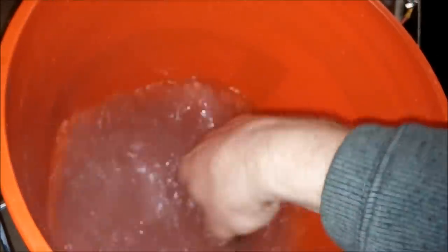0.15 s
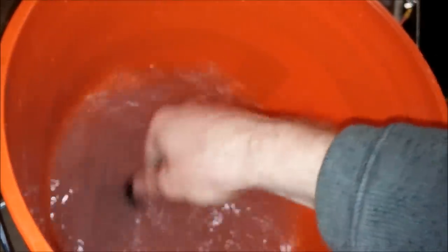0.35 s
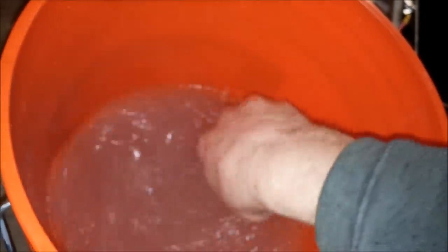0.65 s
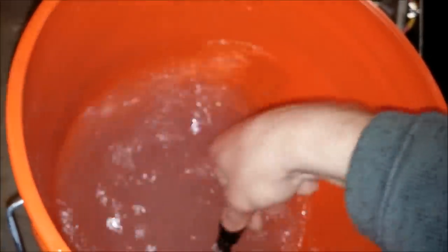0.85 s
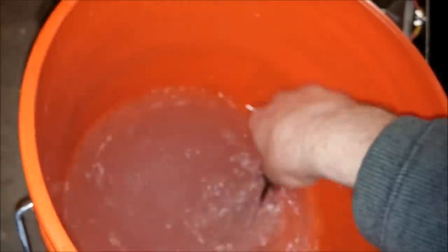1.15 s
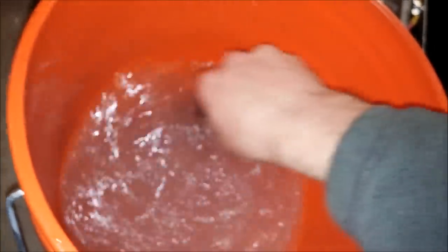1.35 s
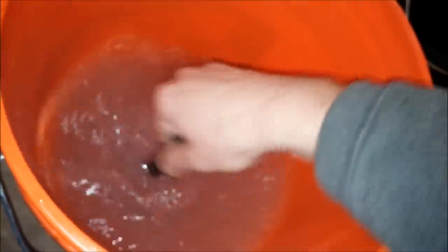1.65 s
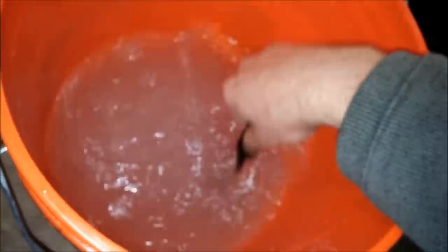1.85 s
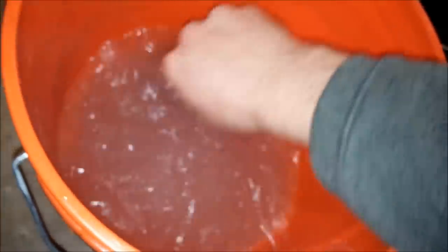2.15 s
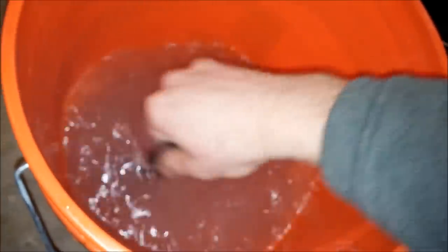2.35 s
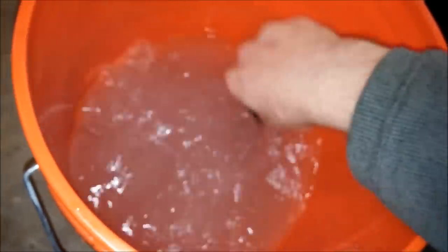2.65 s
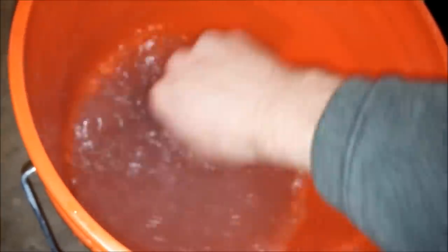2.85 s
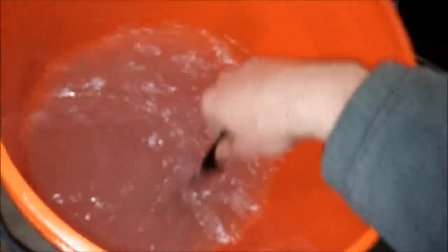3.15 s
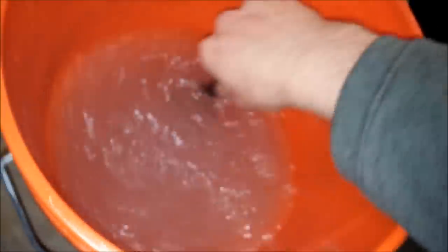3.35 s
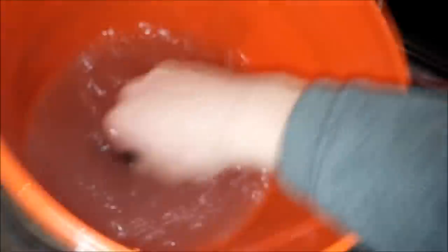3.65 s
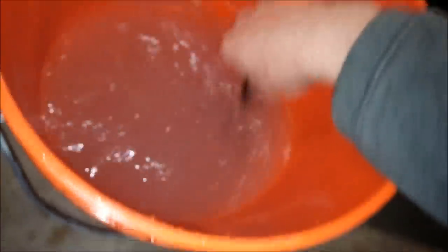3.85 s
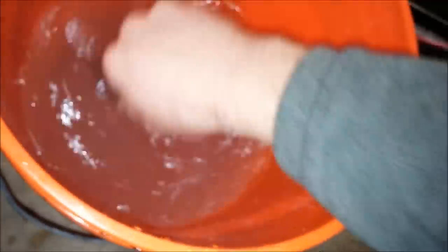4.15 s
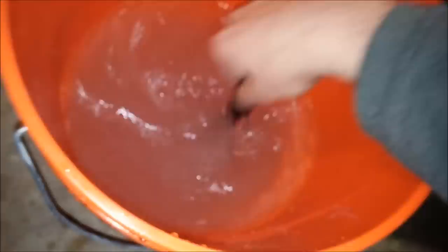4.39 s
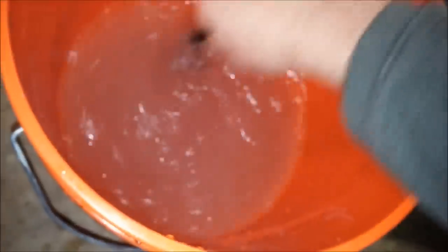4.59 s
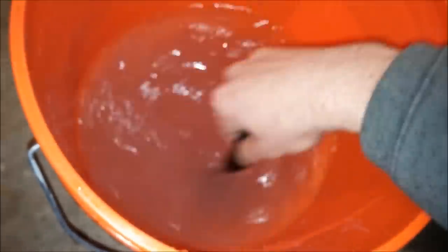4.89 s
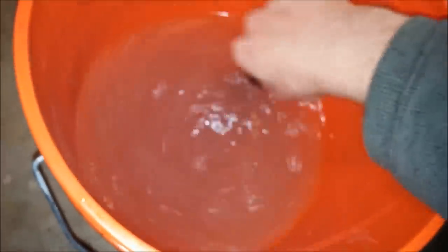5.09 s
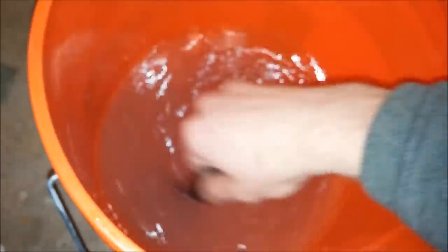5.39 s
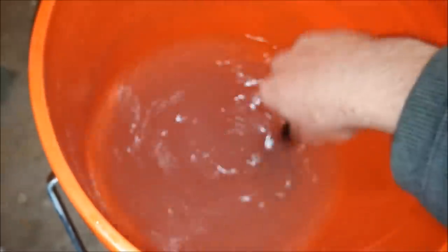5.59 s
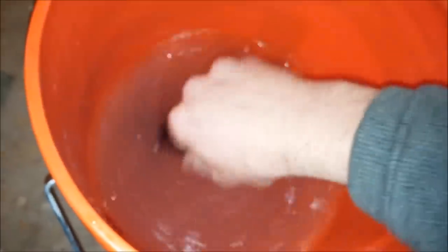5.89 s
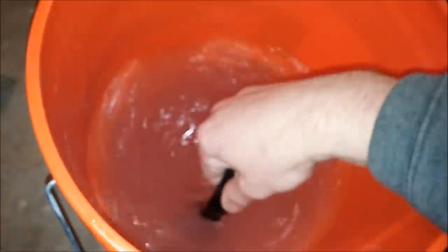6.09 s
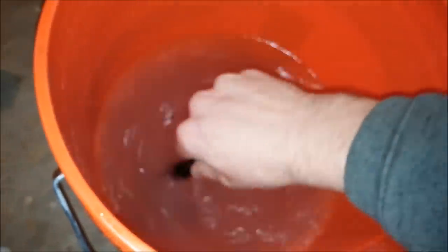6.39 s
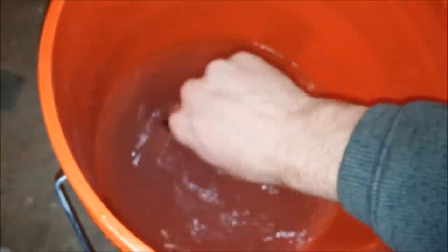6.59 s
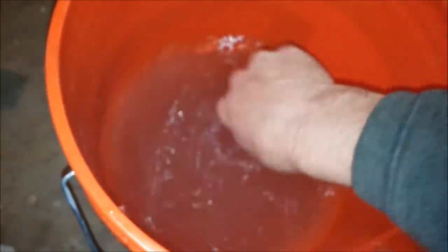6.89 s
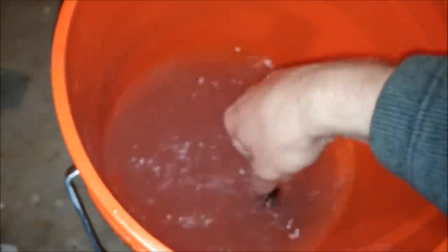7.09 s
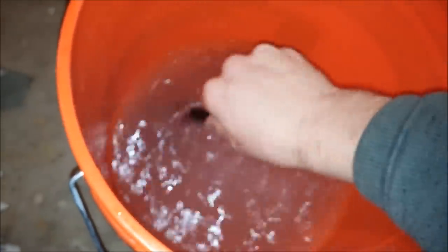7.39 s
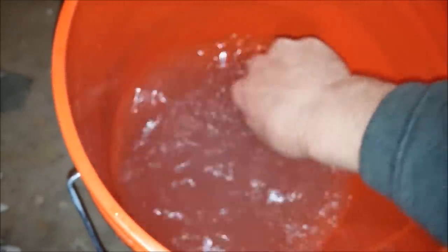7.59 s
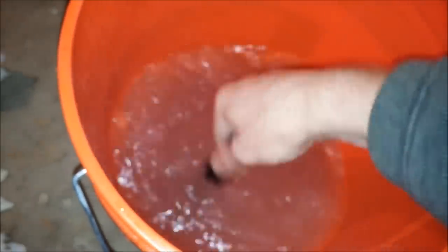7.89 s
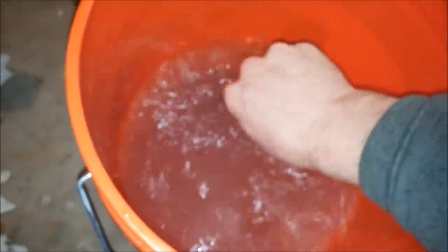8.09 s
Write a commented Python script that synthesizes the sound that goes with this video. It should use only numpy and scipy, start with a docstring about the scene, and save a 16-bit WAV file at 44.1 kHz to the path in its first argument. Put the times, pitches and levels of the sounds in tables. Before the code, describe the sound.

A hand stirs water with a short rod in a plastic bucket, close up in a quiet workshop. From 0 s come strong swashes with round plops and deep hollow gulps, a heavy one near 0.7 s; a faint low drone swells around 0.4 to 1 s and fades by 2 s. Surges follow every fifth to third of a second, with slaps, fizzing spray and snapping droplets, a sharp slap near 2.5 s. A tiny dry tick falls at 3.5 s, a light plastic knock at 4.3 s, then a bright slap at 4.5 s. Stirring grows lighter from 5 s and nearly stops around 6 to 6.3 s, leaving faint bubble blips. A quick string of plops leads into renewed churning at 6.4 s, with a big gulp at 7 s, a ringing slap at 7.3 s and busy sloshing until the end after 8 s. Gaps are damped; the left is louder.

```python
"""Stirring water in a bucket

A hand stirs water in a plastic bucket with a short rod. The wake traps bubbles of all sizes, made as
short fading tones: deep gulps, plops and fine spray, over a wash of shaped noise. The air column above
the water rings like a closed pipe, and the walls scatter the upper notes. A knock, a dry tick and a
faint workshop drone join in. Handheld microphones above the rim turn themselves down in quiet moments.
"""
import sys
import numpy as np
from scipy import signal
from scipy.fft import rfft, irfft, next_fast_len
from scipy.io import wavfile
from scipy.ndimage import uniform_filter1d

SR = 44100
rng = np.random.default_rng(int(sys.argv[2]) if len(sys.argv) > 2 else 0)


def inscribe(sig):
    """Save sig as 16-bit PCM at rate SR to the path in sys.argv[1].

    A 1-D sig is mono; a 2-D sig holds one channel per row.
    Samples are clipped to [-1, 1] before scaling.
    """
    pcm = np.round(np.clip(np.atleast_2d(sig).T, -1, 1) * 32767)
    wavfile.write(sys.argv[1], SR, pcm.astype(np.int16))


def nominal_scale(level):
    """Amplitude ratio for a level in decibels (scalar or array-like)."""
    x = np.asarray(level, float) / 20
    return 10 ** x


N = 363384

# Dull air of the workshop. Each row: frequency in Hz, relative level in dB per Hz.
WORKSHOP_AIR = [(25, -10.5), (60, -1.5), (120, 2), (200, -29), (15000, -63)]
# Low drone near 88 Hz. Each row: time in seconds, level in dB before it wavers.
DRONE = [(0, -54), (.35, -31), (1.0, -35.5), (1.15, -41.5), (2.2, -54)]
# Notes of the air column above the water. Each row: frequency in Hz, width in Hz, strength in dB.
AIR_COLUMN = [(281, 44.3, 18.5), (764, 49, 10.5), (1250, 127, 3), (1580, 324, 1.5), (3920, 2000, -4),
              (6145, 2520, 9)]
# Sound bouncing between the bucket walls. Each row: frequency in Hz, time to fade by 60 dB in seconds.
WALL_FADE = [(300, 0.39), (1500, 0.026), (6000, 0.033), (14000, 0.014)]
# How much louder the left microphone is than the right. Each row: frequency in Hz, difference in dB.
LEFT_OVER_RIGHT = [(60, 5), (380, 3.5), (2380, 8.5), (15000, 5.5)]
# Knocks on the bucket wall. Each row: time in seconds, relative level in dB.
KNOCKS = [(4.316, 3)]
# Dry ticks close to the microphones. Each row: time in seconds, level in dB.
TICKS = [(3.5174, 8.5)]
TICK_ECHO_S = 0.00019
# Droplets snapping. Each row: start in seconds, relative level in dB, first pitch in Hz.
SNAPS = [(0.179, -10.5, 4760), (0.2506, -14.5, 7240), (1.307, -15, 1800), (1.391, -13.5, 4700),
         (1.5092, -10, 5970), (1.664, -10.5, 5570), (1.875, -13.5, 4380), (2.587, -13, 5400),
         (2.6027, -9.5, 4940), (3.052, -12.5, 5800), (4.449, -19.5, 6600), (4.479, -16.5, 5130),
         (7.383, -14, 5600)]
# Bubbles that sing or slide for a while.
# Each row: start in seconds, relative level in dB, first pitch in Hz, last pitch in Hz, length in seconds.
CHIRPS = [(0.833, -13.5, 1500, 1580, 0.012), (1.058, -9, 790, 1410, 0.027), (1.233, 1.5, 625, 820, 0.0085),
          (1.263, -9.5, 645, 920, 0.026), (3.464, -16, 793, 846, 0.036), (3.329, -16.5, 810, 694, 0.043),
          (5.726, -8.5, 1560, 2340, 0.024), (5.992, -24, 934, 960, 0.041), (6.165, -22, 2225, 2170, 0.0087),
          (7.954, -7, 1480, 1860, 0.0056), (7.964, -13.5, 615, 1380, 0.062)]
# Round single plops. Each row: start in seconds, relative level in dB, first pitch in Hz.
PLOPS = [(0.027, 5.5, 2010), (0.339, -4, 1980), (0.363, -1, 2080), (0.423, -8, 1680), (0.994, -16, 885),
         (1.026, -6.5, 1840), (1.285, 4.5, 1284), (1.914, -5, 2100), (1.947, -3.5, 2060), (2.019, -1, 1190),
         (2.130, -9, 784), (2.469, -6, 2100), (2.708, 2, 1250), (3.036, -0.5, 1140), (4.426, -3, 1500),
         (4.902, -10.5, 1550), (5.101, -8.5, 1250), (5.614, -4, 3420), (5.892, -13.5, 1700),
         (6.09, -21, 7060), (6.212, -19.5, 4600), (6.262, -19, 3100), (6.279, -22, 1420),
         (6.313, -10.5, 4620), (6.35, -8, 1950), (6.372, -1.5, 1880), (6.406, -1, 1850), (6.487, 3, 1910),
         (6.558, -2, 1860), (6.572, 3, 525), (6.996, -1, 2190), (7.034, 5.5, 3620), (7.183, 1, 3400),
         (8.224, 0.5, 3700)]
PLOP_CYCLES, PLOP_LAST_OVER_FIRST = 8, 0.89  # length in cycles of the first pitch, ratio of pitches
# Large air pockets closing. Each row: start in seconds, relative level in dB, first pitch in Hz.
GULPS = [(0.002, -3, 324), (0.29, 1.5, 267), (0.672, -2, 340), (1.06, -6.5, 280), (1.173, -0.5, 279),
         (1.641, -8, 260), (2.123, -10, 266), (2.714, -10.5, 250), (3.228, -5.5, 213), (3.647, -11, 267),
         (4.484, -10, 297), (5.596, -10, 250), (6.461, -5, 286), (6.572, 1.5, 281), (7.044, 4, 326),
         (7.742, 1, 270), (7.878, -4.5, 308), (8.189, -5.5, 296)]
# Slaps of water against rod and wall. Each row: start in seconds, relative level in dB, first pitch in Hz.
SLAPS = [(0.073, -1, 715), (0.29, -3, 1310), (0.665, -2.5, 764), (1.232, -11, 1130), (1.392, -11.5, 1276),
         (1.638, -8.5, 720), (1.754, -1, 720), (1.895, -1.5, 1400), (2.482, 2, 774), (3.121, -13, 735),
         (3.217, -11.5, 1520), (3.442, -3, 800), (3.642, -7.5, 1060), (3.818, -5.5, 814), (3.93, -12, 1250),
         (4.019, -12.5, 1050), (4.218, -8.5, 1250), (4.389, -10, 950), (4.533, 0.5, 1380),
         (4.775, -10.5, 1210), (5.171, -7.5, 1120), (5.496, -14.5, 826), (6.677, -8, 1150),
         (6.949, -6, 1150), (6.988, -3.5, 1140), (7.31, 2, 740)]
# Surges of the wake as the rod shoves through. Each row: start in seconds, hold in seconds,
# relative strength in dB, air dragged deep in dB over that strength.
SURGES = [(-0.05, 0.12, -13, 6.5), (0.152, 0.19, -20.5, -4.5), (0.305, 0.35, -30, 4), (0.45, 0.088, -26, 4),
          (0.653, 0.017, -8, 5), (0.978, 0.12, -18.5, -9), (1.124, 0.16, -16.5, 3.5),
          (1.323, 0.097, -26, -47), (1.467, 0.095, -26, -21), (1.631, 0.083, -22.5, 1.5),
          (1.754, 0.23, -21.5, -2.5), (2.053, 0.12, -20, -3.5), (2.247, 0.11, -25, -1.5),
          (2.438, 0.23, -26, -3.5), (2.549, 0.23, -19, -15), (2.899, 0.15, -24, -11.5),
          (3.105, 0.011, -18.5, -9), (3.203, 0.012, -21, 5), (3.421, 0.063, -22.5, 4),
          (3.542, 0.18, -28.5, -4.5), (3.798, 0.15, -21, -7), (4.013, 0.008, -19, -3.5),
          (4.128, 0.17, -34, 4.5), (4.391, 0.097, -15, -8.5), (4.532, 0.054, -17.5, 5),
          (4.756, 0.052, -35.5, 0), (4.852, 0.026, -25.5, -12), (4.98, 0.13, -24, -21),
          (5.154, 0.034, -19, 2), (5.278, 0.057, -30.5, -22), (5.56, 0.2, -22.5, -4.5),
          (5.863, 0.12, -36, -12), (6.163, 0.12, -61, -9), (6.256, 0.046, -40, -37),
          (6.319, 0.074, -26.5, -24), (6.429, 0.24, -17.5, -2.5), (6.793, 0.21, -18.5, -0.5),
          (6.996, 0.083, -20.5, 12.5), (7.123, 0.35, -21, -3.5), (7.565, 0.18, -18, -13.5),
          (7.724, 0.17, -24, 8.5), (7.88, 0.3, -27.5, -6), (8.08, 0.33, -23.5, -33), (8.164, .1, -17.5, 0)]
RISE_S, SETTLE_DB_PER_S = 0.024, 174  # every surge swells, holds and settles alike
RIPPLE_DB, RIPPLE_DB_PER_S, RIPPLE_DEEP_DB = -22.5, 33.5, -40  # weak ripples that settle slowly
# How much the rod breaks the surface. Each row: time in seconds, relative spray level in dB.
BREAKING = [(0, -19.5), (1.6, -22.5), (2.6, -19.5), (3.4, -24.5), (4.6, -31.5), (5.4, -25), (6.6, -28.5),
            (7.2, -23.5), (8.24, -20.5)]
SPRAY_FOLLOWS = 0.69  # power below 1: spray swings less than the surge
# Churned water heard between the bubbles. Each row: frequency in Hz, relative level in dB per Hz.
WASH = [(120, -6), (300, -19), (500, -35.5), (1300, -5), (2600, -10), (6000, -28.5), (10000, -29),
        (16000, -34)]


def unit(x):
    """Scale to an rms of 1."""
    return x / np.sqrt(np.mean(x ** 2) + 1e-20)


def along(points, hz):
    """Read a curve of (Hz, value) points on a log frequency axis."""
    f, v = np.transpose(points)
    return np.interp(np.log(hz + 1), np.log(f + 1), v)


def curves(rows):
    """Give one value per sample for each column after the time."""
    s, *cols = np.transpose(rows)
    return [np.interp(np.arange(N) / SR, s, c) for c in cols]


def filtered(x, response):
    """Filter x by a response, possibly complex, given as a function of frequency in Hz."""
    m = next_fast_len(N + SR // 2)
    spectrum = rfft(x, m) * response(np.fft.rfftfreq(m, 1 / SR))
    return irfft(spectrum, m)[..., :N]


def bursts(s, db, decay_s):
    """A gain that jumps at each time and dies away."""
    kicks = np.bincount(np.round(s * SR).astype(int), nominal_scale(db), N)
    return signal.lfilter([1], [1, -np.exp(-1 / (decay_s * SR))], kicks)


def bubbles(s, db, hz, cycles, rise, size, vary=0.1):
    """Sines that swell, fade and glide up as they near the surface, each from its own spot in the bucket."""
    traits = np.tanh(rng.standard_normal((len(s), 3)))
    spot, life, climb = traits[:, :1], traits[:, 1:2], traits[:, 2:]
    at = np.round(s * SR).astype(int)[:, None] + np.arange(size)
    taper = np.linspace(1, 0, size) ** 0.5
    out = np.zeros((2, N))
    for ear, side in enumerate((1, -1)):
        delay = 7e-5 * (1 + side * spot)  # path to each microphone, in seconds
        t = np.maximum(np.arange(size) / SR - delay, 0)
        age = t * hz[:, None] / (cycles * np.exp(vary * life))
        glide = 1 + rise * np.exp(1.24 * climb) * age / 2
        wave = np.sin(2 * np.pi * hz[:, None] * t * glide)
        wave *= np.exp(-age) * (1 - np.exp(-1.5 * age))
        wave *= nominal_scale(db[:, None] + 2.4 * side * spot) * taper
        out[ear] = np.bincount(at.ravel(), wave.ravel(), N + size + SR)[:N]
    return out


def sliding_bubbles(rows):
    """Each clear bubble swells, slides ever faster from its first to its last pitch and fades."""
    out = np.zeros(N + SR)
    for s, db, first, last, length in rows:
        peak_shape = 0.45 + 0.41 * np.log2(max(last / first, 1))  # those that climb far peak late
        u = np.arange(round(length * SR)) / (length * SR)  # 0 to 1 over the bubble's life
        pitch = first * (last / first) ** u ** 2
        tone = np.sin(2 * np.pi * np.cumsum(pitch) / SR)
        out[round(s * SR):][:len(u)] += nominal_scale(db) * np.sin(np.pi * u ** peak_shape) * tone
    return out[:N]


def workshop():
    """Dull room air as shaped noise, and a low sine drone that wavers in pitch and level."""
    air = filtered(rng.standard_normal((3, N)), lambda hz: nominal_scale(along(WORKSHOP_AIR, hz)))
    shared_air = unit(air[0] + 0.5 * air[1:])  # partly alike in both ears
    waver = unit(filtered(rng.standard_normal(N), lambda hz: hz < 12))
    tone = np.sin(2 * np.pi * np.cumsum(88 + 3.3 * waver) / SR)
    drone = nominal_scale(3.1 * waver[::-1]) * tone  # the reversed waver moves the level
    return nominal_scale(-50.5) * shared_air + nominal_scale(curves(DRONE)[0]) * drone


def scattered(x):
    """The walls scatter the upper notes differently to each microphone, anew as the surface moves."""
    out, hop = np.zeros((2, N + 3 * SR)), SR // 8
    padded = np.pad(x, ((0, 0), (hop, 2 * hop)))
    for at in range(-hop, N, hop):  # overlapping pieces, each with a fresh noise tail
        hz, t, z = signal.stft(rng.standard_normal((2, SR // 6)), SR, nperseg=128)
        fade = nominal_scale(-60 * t / along(WALL_FADE, hz)[:, None])
        upper = (hz ** 2 / (hz ** 2 + 700 ** 2))[:, None] ** 2
        tail = signal.istft(z * fade * upper, SR, nperseg=128)[1]
        part = padded[:, at + hop:at + 3 * hop] * np.hanning(2 * hop)
        wet = signal.fftconvolve(part, tail / np.linalg.norm(tail[0]), axes=1)
        out[:, at + hop:][:, :wet.shape[1]] += wet
    return out[:, hop:N + hop]


def column_response(f):
    """The air column lifts its own notes, cancels between the lowest two and thins out below them."""
    notes = sum(nominal_scale(db) * 1j * f * w / (c * c - f * f + 1j * f * w) for c, w, db in AIR_COLUMN)
    dip = 1 - 0.59 / (1 + 1j * (f - 520) / 90)
    low_cut = (1j * f / (120 + 1j * f)) ** 2
    return (1 + notes) * dip * low_cut


def bucket(x, clear):
    """The column colours x, some clear sound passes straight by, and the walls answer both."""
    rung = filtered(x, column_response)
    return rung + 0.27 * clear + nominal_scale(1.5) * scattered(rung + 0.5 * clear)


def tick():
    """A dry one-sample click and its inverted echo."""
    out = np.zeros(N)
    for s, db in TICKS:
        out[[round(s * SR), round((s + TICK_ECHO_S) * SR)]] += nominal_scale(db) * np.array([1, -1])
    return out


def knock():
    """A click and one slow, quickly damped swing of the plastic wall."""
    out, t = np.zeros(N), np.arange(SR // 8) / SR
    swing = np.sin(2 * np.pi * 110 * t) * np.exp(-t / 0.0042)
    click = np.exp(-t / 0.00067) * np.tanh(t / 0.00004)
    for s, db in KNOCKS:
        out[round(s * SR):][:len(t)] += nominal_scale(db) * (0.27 * swing - 0.31 * click)
    return out


def snaps():
    """Droplets bursting near the rim: bubble tones that die within about a cycle."""
    return nominal_scale(20.5) * bubbles(*np.transpose(SNAPS), cycles=0.78, rise=0.0076, size=200)


def chirps():
    """Singing bubbles with their own slides, and plops that all fall by the same ratio."""
    plops = [(s, db, hz, PLOP_LAST_OVER_FIRST * hz, PLOP_CYCLES / hz) for s, db, hz in PLOPS]
    return sliding_bubbles(CHIRPS + plops)


def splashes():
    """Gulps, and slaps short enough to set the whole air column ringing."""
    gulps = bubbles(*np.transpose(GULPS), cycles=1.41, rise=0.0033, size=2600)
    slaps = bubbles(*np.transpose(SLAPS), cycles=1.56, rise=0.078, size=600)
    return nominal_scale(-11.0) * gulps + nominal_scale(-1.5) * slaps


def surges():
    """Gains of the froth and of the deep air pockets, summed over all surges."""
    t, froth, deep = np.arange(N) / SR, 0, 0
    for s, hold, db, deep_db in SURGES:
        rise = np.clip((t - s) / RISE_S, 0, 1)
        after = np.maximum(t - s - hold, 0)  # seconds since the hold ended
        shove = rise * nominal_scale(db - SETTLE_DB_PER_S * after)
        ripple = rise * nominal_scale(db + RIPPLE_DB - RIPPLE_DB_PER_S * after)
        froth = froth + shove + ripple
        deep = deep + nominal_scale(deep_db) * shove + nominal_scale(RIPPLE_DEEP_DB) * ripple
    return froth, deep


def swarm(eddies, count, centre_hz, spread, cycles, scatter_db, size):
    """Bubbles shed just after each eddy breaks; those of one eddy share its strength and lean to its size."""
    at, force, fine = eddies[:, rng.integers(eddies.shape[1], size=count)]
    s = np.clip(at + rng.exponential(0.016, size=count), 0, N / SR)
    lean = np.sqrt(0.5) * (fine + rng.standard_normal(count))
    hz = np.clip(centre_hz * np.exp(spread * lean), 100, 15000)
    db = 4.8 * force + scatter_db * np.clip(rng.standard_normal(count), -2, 2)
    db = db - 1.3 * np.log2(hz / centre_hz)  # small ones are weaker
    return unit(bubbles(s, db, hz, cycles, 0.048, size, vary=0.84))


def wake():
    """Swarms of large, middle and tiny bubbles over churned water; slaps add to all but the large ones."""
    surge, deep = surges()
    s, db, _ = np.transpose(SLAPS)
    froth = nominal_scale(-14.0) * surge + bursts(s, db - 16.5, decay_s=0.0078)
    slap_spray = bursts(s, SPRAY_FOLLOWS * db - 2.0, decay_s=0.0034)
    spray = nominal_scale(curves(BREAKING)[0] - 9.5) * (surge ** SPRAY_FOLLOWS + slap_spray)
    # rows: time in seconds, strength, fineness
    eddies = np.vstack([rng.random(size=1400) * N / SR, np.tanh(rng.standard_normal((2, 1400)))])
    large = swarm(eddies, count=2600, centre_hz=272, spread=0.33, cycles=0.73, scatter_db=2.0, size=900)
    middle = swarm(eddies, count=8500, centre_hz=1500, spread=0.5026, cycles=3.6, scatter_db=3.5, size=520)
    tiny = swarm(eddies, count=24000, centre_hz=5005, spread=0.613, cycles=2.6, scatter_db=8.5, size=140)
    churn = rng.standard_normal((2, N)) * froth ** 0.39 * spray ** 0.36
    wash = filtered(churn, lambda hz: nominal_scale(along(WASH, hz) + 5.0))
    return nominal_scale(-22.0) * deep * large + froth * middle + spray * tiny + wash


def scene():
    """Water in the bucket, in the workshop; droplets, knock and tick are also heard outside the bucket."""
    drops, blows = snaps(), splashes()
    water = bucket(wake() + blows + 0.33 * drops, chirps() + 0.47 * blows)
    return water + 0.33 * drops + knock() + tick() + workshop()


def low_pass(x):
    """Removes everything above the highest recorded frequency."""
    return signal.sosfilt(signal.butter(12, 16000, fs=SR, output="sos"), x)


def record(dry):
    """Two microphones, the left louder, cut deep bass, add hiss, gate quiet sound and clip peaks softly."""
    lean = np.outer([0.5, -0.5], along(LEFT_OVER_RIGHT, np.fft.rfftfreq(next_fast_len(N + SR // 2), 1 / SR)))
    x = filtered(dry, lambda hz: nominal_scale(lean) * 1j * hz / (55 + 1j * hz))
    hiss = filtered(rng.standard_normal(x.shape), lambda hz: 1 / (1 + (hz / 6000) ** 2))
    x = x + nominal_scale(-54.5) * hiss
    # the gate leaves the bass alone and follows the power of the rest
    bass = filtered(x, lambda hz: 1 / (1 + (hz / 150) ** 4))
    keep = np.exp(-1 / (0.009 * SR))  # 9 ms averaging
    power = signal.lfilter([1 - keep], [1, -keep], np.mean((x - bass) ** 2, 0))
    gate = power / (power + nominal_scale(-45.0) ** 2)  # half open at -45 dB
    x = bass + (x - bass) * uniform_filter1d(gate, size=150)
    x = x / (1 + np.abs(x) ** 6) ** (1 / 6)  # soft clipping
    return low_pass(x)


dry = scene()
out = record(dry)
inscribe(out)
```